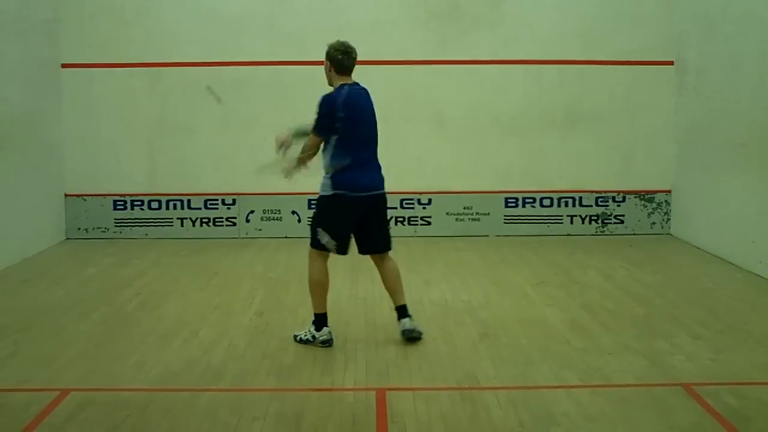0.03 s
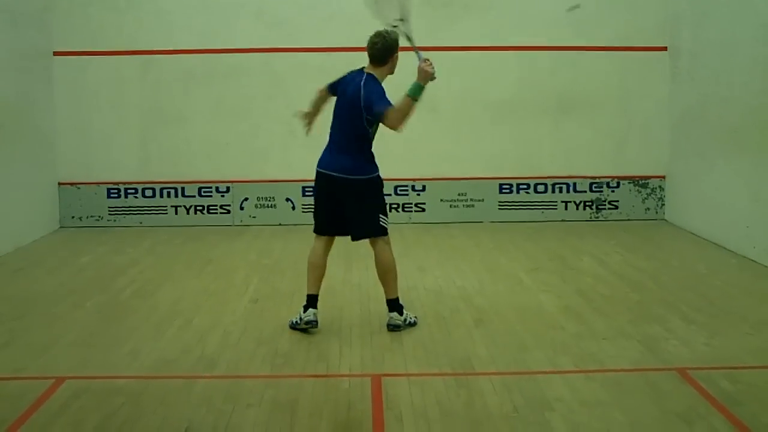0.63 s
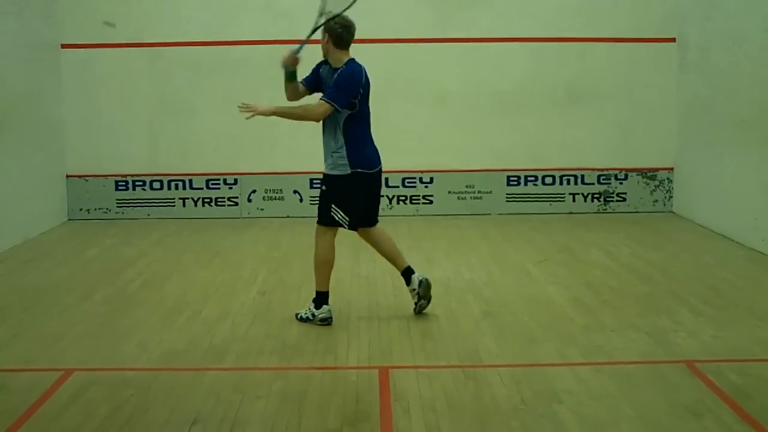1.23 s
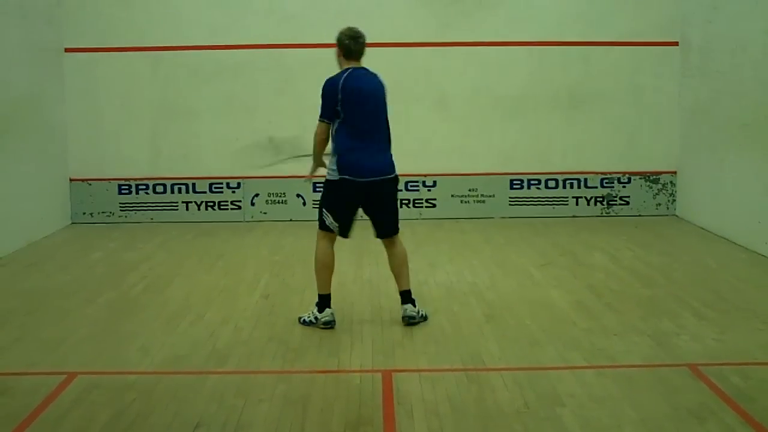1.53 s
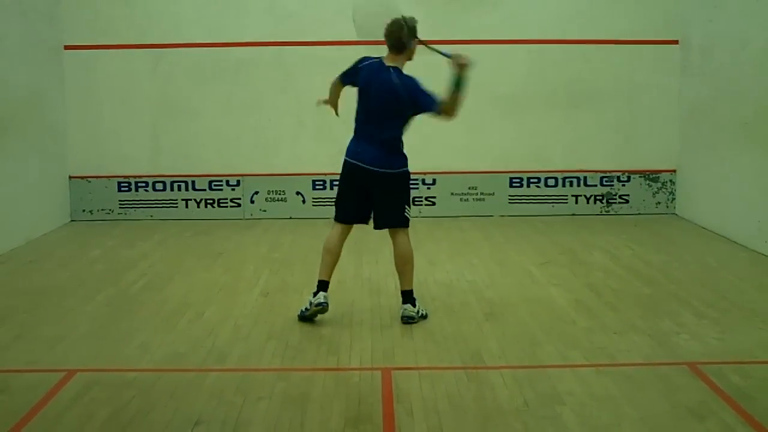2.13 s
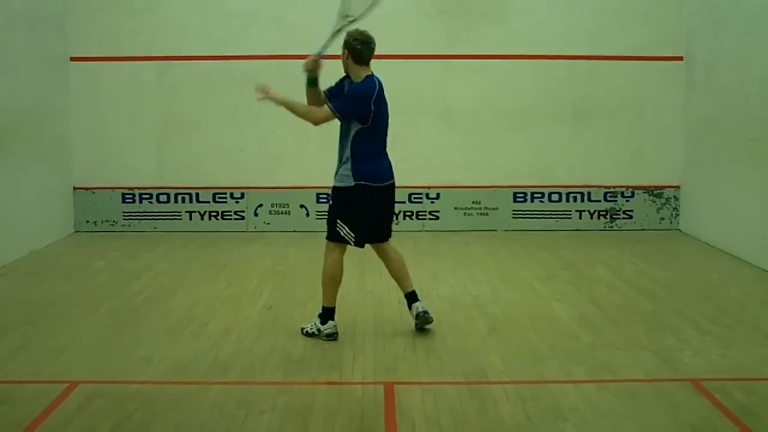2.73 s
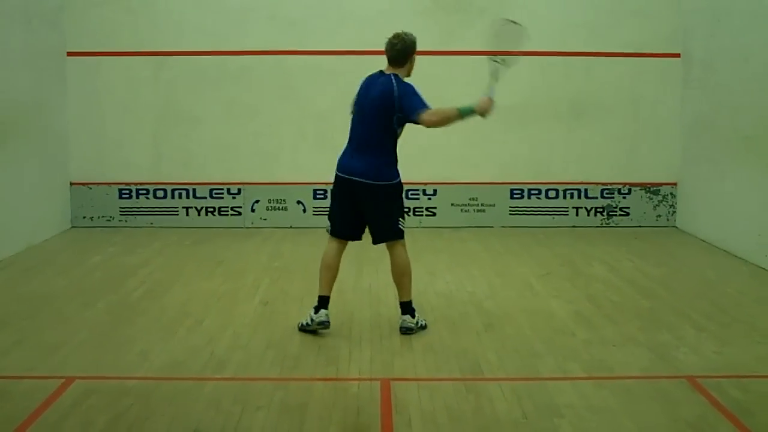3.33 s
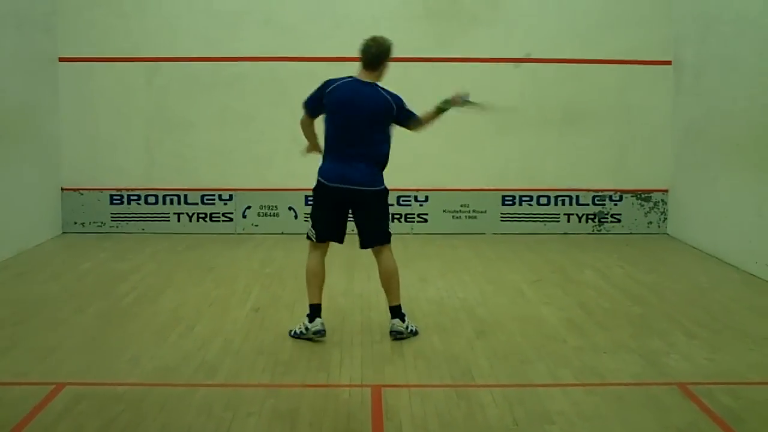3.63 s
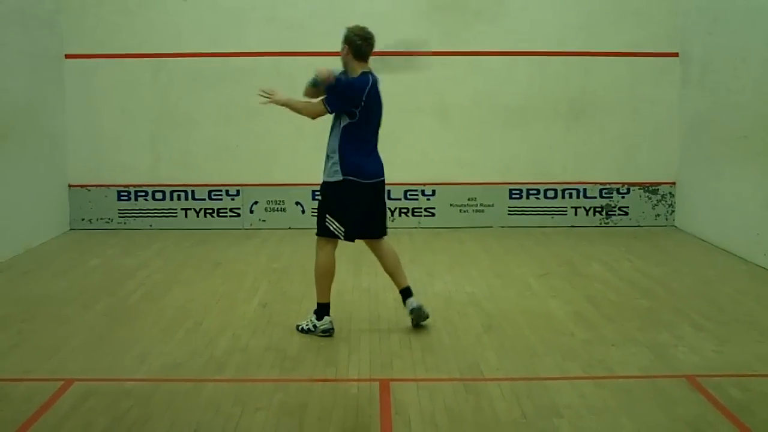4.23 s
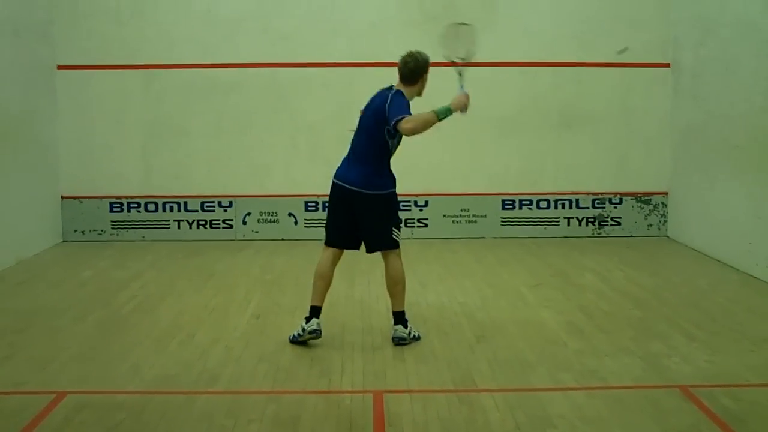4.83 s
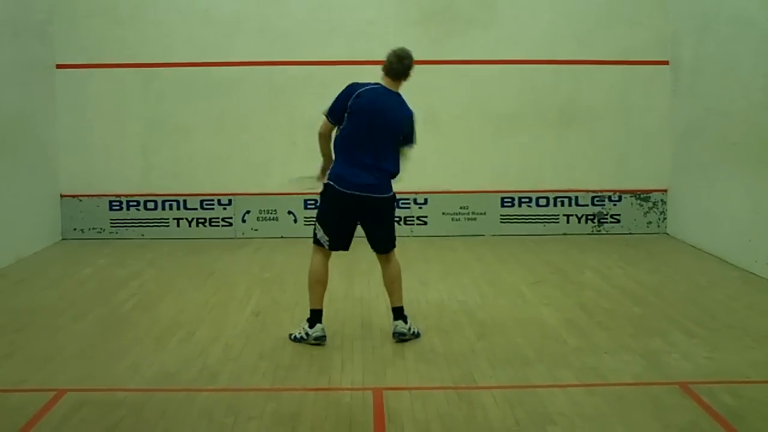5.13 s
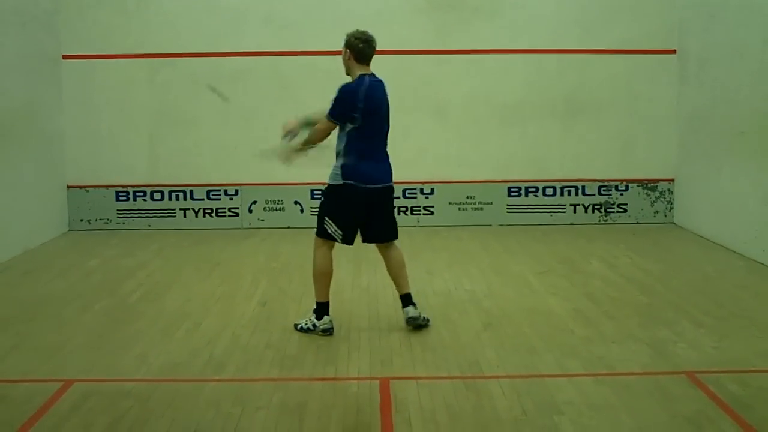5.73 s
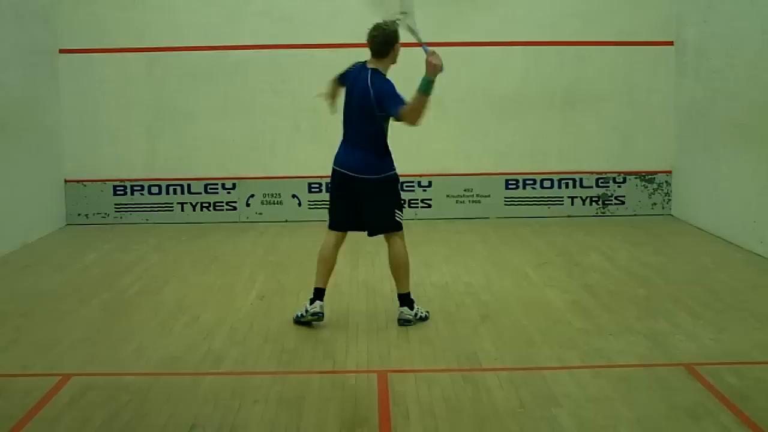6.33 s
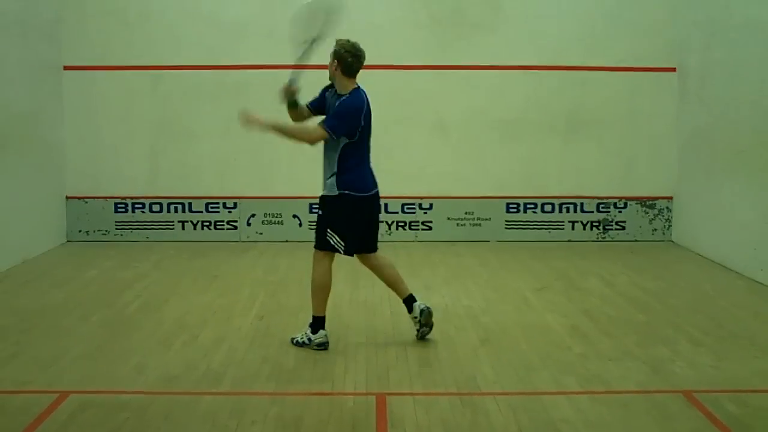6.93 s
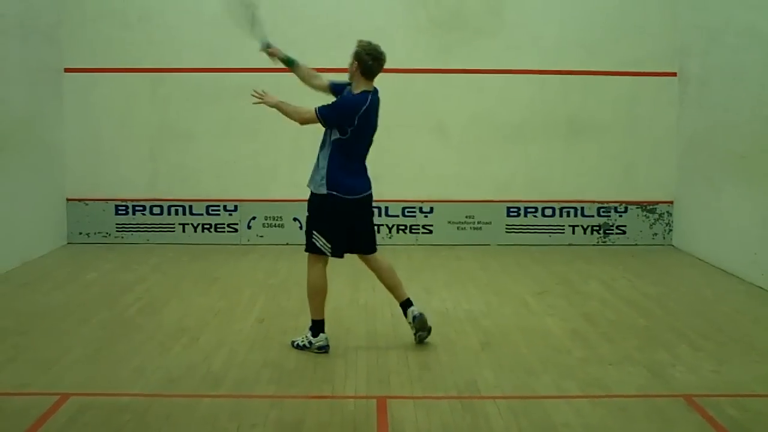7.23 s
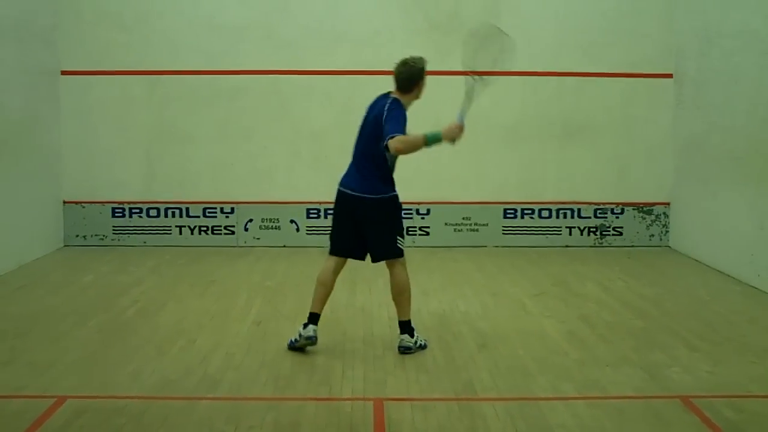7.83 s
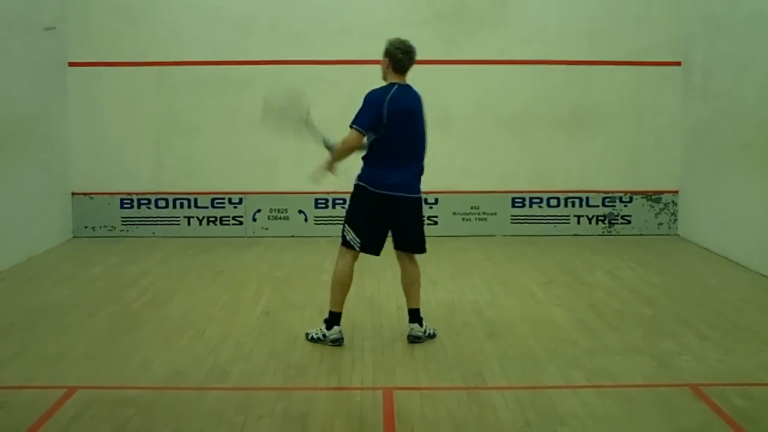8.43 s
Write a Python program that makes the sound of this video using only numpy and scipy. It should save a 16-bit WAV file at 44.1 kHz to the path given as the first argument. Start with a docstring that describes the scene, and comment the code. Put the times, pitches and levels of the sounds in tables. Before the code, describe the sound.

A squash ball is volleyed against a wall, hollow racket pocks and sharper smacks repeating steadily in an echoing court.

```python
"""A player volleys a squash ball against the front wall of a bare, echoing court.
First the racket squashes the hollow ball, which sounds a pock; on some strokes the strings ring.
About a seventh of a second later the ball meets the wall with a sharper smack. The hard walls return
a few distinct echoes, which merge into a long reverberant wash. Faint taps and ball thuds on the
floor follow between strokes, and under the whole rally the ventilation rumbles."""
import sys
import numpy as np
from scipy import signal
from scipy.fft import rfft, irfft
from scipy.io import wavfile

SR = 44100
rng = np.random.default_rng(int(sys.argv[2]) if len(sys.argv) > 2 else 0)


def master(y):
    """Save y as 16-bit WAV."""
    cut = np.clip(np.atleast_2d(y).T, -1, 1)
    pcm = np.round(cut * 32767)  # scale
    wavfile.write(sys.argv[1], SR, pcm.astype(np.int16))


N = 383669

# racket strokes: start_s, level_db, ball_pitch_hz, direct_db, string_ring_db
RACKET_STROKES = [(-.55, -5, 820, 0, -20), (.1670, 3, 845, 0, 2), (.8895, 3.5, 830, 0, -1),
                  (1.5789, 3, 780, -6, -13), (2.3134, 3, 890, -2, -4), (3.0551, 2, 807, -2.5, -28),
                  (3.7494, 4.5, 795, -2.5, -9), (4.4590, 2, 790, -0.5, -5), (5.1589, 2.5, 794, -4.5, -20),
                  (5.8530, 2.5, 827, 0.5, -14), (6.5780, 4.5, 840, -4.5, -7), (7.3133, -1.5, 930, -2, -13),
                  (8.214, 3, 820, -1, -17)]
# impacts on the front wall: start_s, level_db, ball_pitch_hz, hollow_tone_db
WALL_SMACKS = [(-.40, 1, 840, 0), (0.3175, 0, 945, -3.5), (1.0191, 1, 842, 2), (1.7324, -1.5, 960, -1),
               (2.4767, -0.5, 930, -3), (3.1990, 0, 916, -1.5), (3.8880, 0.5, 834, -0.5),
               (4.6100, 0, 850, -2.5), (5.2936, 0, 794, 1.5), (6.0170, -2, 910, 0.5), (6.7142, 0.5, 797, 3),
               (7.5501, -7.5, 980, -1), (8.3626, -0.5, 814, 2.5)]
# first paths of a stroke, straight and by floor and walls: detour_m, snap_over_tone_db
RACKET_PATHS = [(0, 4.5), (.9, 3.5), (2.9, -25), (8, 19), (9, 20.5)]
# first paths of a smack: detour_m, snap_over_tone_db
WALL_PATHS = [(0, 4), (.8, 2.5), (3.3, -20), (4.7, 6), (8.2, -3)]
# spectrum of a stroke's reverberation, under the ball's own tone: frequency_hz, density_db
RACKET_SPECTRUM = [(80, -78.5), (110, -63.5), (150, -58.5), (190, -59), (260, -54), (380, -52.5),
                   (590, -59.5), (730, -53.5), (1250, -58), (1800, -70.5), (2500, -76), (3300, -70.5),
                   (4500, -77.5), (10000, -78)]
# spectrum of a smack's reverberation, under the ball's own tone: frequency_hz, density_db
WALL_SPECTRUM = [(80, -67), (110, -58), (185, -54.5), (270, -46), (400, -45.5), (610, -53), (740, -50.5),
                 (1250, -52), (1600, -52.5), (2300, -63.5), (3400, -63.5), (4200, -68), (6200, -71),
                 (10000, -67)]
# reverberation times of the court: frequency_hz, t60_s
COURT_DECAY = [(170, 1.07), (300, 1.59), (680, 2.68), (900, 2.75), (1200, 2.31), (3200, 1.95), (5500, 1.38),
               (10000, 0.76)]
# faint taps and ball thuds on the floor between strokes: start_s, level_db
FLOOR_TAPS = [(0.727, -24), (1.382, -18.5), (2.199, -24), (2.849, -23), (3.584, -21), (5.061, -25),
              (6.449, -24)]
# spectrum of the ventilation: frequency_hz, density_db
VENT_SPECTRUM = [(15, -77), (30, -68.5), (42, -82), (58, -68.5), (80, -96), (200, -72.5), (1000, -103),
                 (4000, -104), (11000, -109)]

SOUND_M_PER_S = 343
AGE = np.arange(2 * SR) / SR  # time since a blow, s
CONTACT_AGE = AGE[:SR // 25]  # its first 40 ms
FREQS = np.arange(SR + 1) / 2  # frequency axis of a signal as long as AGE, Hz


def racket(bands, pock_db=-14, knock_db=-31, crack_db=-29.2, hollow_db=6, squashed=0.91):
    """Impact excitation: a stroke sets the ball's cavity, its shell and the strings vibrating."""
    out = np.zeros(N)
    paths = first_paths(RACKET_PATHS, distance_m=6.5, level_db=-2.5, slope_db_per_m=-1.4)
    for start_s, level_db, ball_hz, direct_db, ring_db in RACKET_STROKES:
        # a stroke off the sweet spot rings the strings, sounds less hollow and cracks more
        tone_db = -1.35 - 0.048 * ring_db
        bright_db = 0.14 * ring_db
        flattened_hz = ball_hz * squashed  # the pitch is lower while the ball is flat
        tone = from_db(pock_db + tone_db) * pock(flattened_hz, swell_s=0.0021)
        snap = from_db(crack_db + bright_db) * crack(decay_s=0.0013, low_hz=3000)
        snap += from_db(knock_db) * knock(swell_s=0.0027)
        colour = blow_colour(RACKET_SPECTRUM, ball_hz, hollow_db + tone_db, treble_db=2.8 + bright_db)
        room = wash(colour, bands, start_s=0.0096, build_s=0.038)
        near = from_db(direct_db) * early_sound(paths, tone, snap)
        add(out, from_db(level_db) * (near + room + from_db(ring_db) * string_ring()), start_s)
    return out


def wall(bands, pock_db=-10, knock_db=-16.5, crack_db=-21, click_db=-7, hollow_db=5, squashed=0.905):
    """A shorter contact has a wider spectrum: the hard wall gives a sharper smack than the racket."""
    out = np.zeros(N)
    paths = first_paths(WALL_PATHS, distance_m=5.7, level_db=-0.1, slope_db_per_m=0.54)
    for start_s, level_db, ball_hz, tone_db in WALL_SMACKS:
        # a ball squashed flat sounds hollower, cracks more and knocks less
        bright_db, shell_db = 0.56 * tone_db, -0.32 * tone_db
        direct_db = -1.6 + 0.27 * tone_db
        tone_gain = from_db(pock_db + tone_db)
        tone = tone_gain * pock(ball_hz * squashed, swell_s=0.0018)
        slap = from_db(crack_db) * crack(decay_s=0.00093, low_hz=5200)
        slap += from_db(click_db) * contact_click(low_hz=7100)
        snap = from_db(bright_db) * slap + from_db(knock_db + shell_db) * knock(swell_s=0.0011)
        colour = blow_colour(WALL_SPECTRUM, ball_hz, hollow_db + tone_db, treble_db=bright_db)
        room = wash(colour, bands, start_s=0.00074, build_s=0.032)
        echoes = flutter_echo(tone_gain * pock(ball_hz, swell_s=0.0034))
        hum = court_ring()
        near = from_db(direct_db) * early_sound(paths, tone, snap)
        add(out, from_db(level_db) * (near + room + echoes + hum), start_s)
    return out


def pock(hz, swell_s):
    """Damped oscillation: the squashed hollow ball swings for a few cycles."""
    return -np.sin(2 * np.pi * hz * CONTACT_AGE) * swell(swell_s)


def knock(swell_s, upper_db=-8):
    """Flexural resonance: the ball's shell sounds in two broad bands above its hollow tone."""
    shape = swell(swell_s)
    lower = burst(shape, low_hz=1080, high_hz=1690)
    upper = burst(shape, low_hz=2020, high_hz=3800)
    return lower + from_db(upper_db) * upper


def crack(decay_s, low_hz):
    """A brief transient is broadband: rubber slaps down in a bright burst."""
    return burst(np.exp(-CONTACT_AGE / decay_s), low_hz, high_hz=13500, order=1)


def contact_click(low_hz):
    """The first touch on hard plaster is an impulse, high-passed to a needle-sharp click."""
    highpass = signal.butter(2, low_hz, "high", fs=SR, output="sos")
    return signal.sosfilt(highpass, signal.unit_impulse(len(CONTACT_AGE)))


def string_ring():
    """Free vibration of the strings: a thin ring, blurred by the court."""
    return from_db(-58) * resonance_cluster(hz=2114, octaves=0.052, decay_s=0.24, build_s=0.011)


def swell(peak_s):
    """Elastic compression and release: an envelope that rises to 1 and quickly falls."""
    t = CONTACT_AGE / peak_s
    return (t * np.exp(1 - t)) ** 2


def burst(shape, low_hz, high_hz, order=2):
    """Band-limited noise, scaled to carry the energy of its envelope."""
    band = signal.butter(order, [low_hz, high_hz], "band", fs=SR, output="sos")
    noise = signal.sosfilt(band, rng.standard_normal(len(shape)) * shape)
    return noise * np.sqrt(np.sum(shape ** 2) / np.sum(noise ** 2))


def first_paths(detours, distance_m, level_db, slope_db_per_m):
    """Spherical spreading, plus a level slope along the detour; gives delay_s, tone_db, snap_db."""
    detour_m, snap_over_tone_db = np.transpose(detours)
    tone_db = level_db - 20 * np.log10(1 + detour_m / distance_m) + slope_db_per_m * detour_m
    return np.column_stack([detour_m / SOUND_M_PER_S, tone_db, tone_db + snap_over_tone_db])


def early_sound(paths, tone, snap, wander=.02):
    """Direct sound and early reflections superpose; the detours shift a little from shot to shot."""
    out = np.zeros(len(AGE))
    for delay_s, tone_db, snap_db in paths:
        arrival_s = delay_s * (1 + wander * rng.standard_normal())
        add(out, from_db(tone_db) * tone + from_db(snap_db) * snap, arrival_s)
    return out


def flutter_echo(tone, first_db=-9, step_db=-1.58, spread_db=4, trip_s=.057, count=9):
    """Flutter echo: the tone shuttles between front and back wall, unevenly strong on each return."""
    out = np.zeros(len(AGE))
    for k, (late, strength) in enumerate(rng.standard_normal((count, 2))):
        gain = from_db(first_db + k * step_db + spread_db * strength)
        add(out, gain * tone, (k + 2 + 0.0989 * late) * trip_s)
    return out


def wash(colour, bands, start_s, build_s, first_per_s=2500, thicken_s=.05):
    """Diffuse reverberation: reflections grow denser with time squared and die band by band."""
    chance = np.minimum(first_per_s * (1 + AGE / thicken_s) ** 2 / SR, 1)
    arrivals = rng.standard_normal(len(AGE)) * (rng.random(len(AGE)) < chance) / np.sqrt(chance)
    spectrum = rfft(arrivals) * colour * np.sqrt(SR / 2)
    swelling = .5 + .5 * np.tanh((AGE - start_s) / build_s)  # thin until the side walls have answered
    return sum(irfft(spectrum * share) * fade for share, fade in bands) * swelling


def blow_colour(table, ball_hz, tone_db, treble_db, ball_octaves=0.18, shelf_hz=2000):
    """A blow's spectrum: the ball's resonance adds a peak, its crack a treble shelf."""
    shelf = FREQS ** 2 / (FREQS ** 2 + shelf_hz ** 2)
    return from_db(at_hz(table, FREQS) + tone_db * bell(ball_hz, ball_octaves) + treble_db * shelf)


def court_bands():
    """Each overlapping band falls 60 dB in its reverberation time; gives (weights, envelope) pairs."""
    centres_hz, t60s = np.transpose(COURT_DECAY)
    shares = [at_hz(np.column_stack([centres_hz, one]), FREQS) for one in np.eye(len(centres_hz))]
    ending = np.minimum(1, 2 * (AGE[-1] - AGE))
    return [(share, np.exp(-np.log(1000) * AGE / t60) * ending) for share, t60 in zip(shares, t60s)]


def court_ring():
    """Room resonance: the court's longest ring lingers after a smack."""
    return from_db(-58.5) * resonance_cluster(hz=1000, octaves=0.095, decay_s=0.65, build_s=0.067)


def resonance_cluster(hz, octaves, decay_s, build_s):
    """Closely spaced resonances beat: narrow-band noise that builds up and dies away."""
    narrow = irfft(rfft(rng.standard_normal(len(AGE))) * bell(hz, octaves)) * np.sqrt(SR / 2)
    rise = 1 - np.exp(-(AGE / build_s) ** 2)
    ending = np.minimum(1, AGE[-1] - AGE)
    return narrow * rise * np.exp(-AGE / decay_s) * ending


def floor_taps(bands, crack_db=-29, thud_db=-10):
    """Light impacts excite the room: faint taps and ball thuds on the floor between strokes."""
    out = np.zeros(N)
    colour = from_db(at_hz(RACKET_SPECTRUM, FREQS) + 5.5)
    for start_s, level_db in FLOOR_TAPS:
        tap = wash(colour, bands, start_s=.005, build_s=0.011)
        add(tap, from_db(crack_db) * crack(decay_s=0.0053, low_hz=1500), 0)
        add(tap, from_db(thud_db) * pock(hz=820, swell_s=0.0018), 0)
        add(out, from_db(level_db) * tap, start_s)
    return out


def ticks(per_s=9, loudest_db=-39.25, range_db=1):
    """Random transients: the moving player's soles and clothes tick faintly."""
    out = np.zeros(N)
    for when, softness in rng.random((round(per_s * N / SR), 2)):
        gain = from_db(loudest_db - range_db * softness)
        add(out, gain * crack(decay_s=0.00074, low_hz=3000), when * N / SR)
    return out


def ventilation():
    """Stationary coloured noise: a low rumble with a trace of hiss."""
    colour = from_db(at_hz(VENT_SPECTRUM, np.arange(N // 2 + 1) * SR / N))
    return irfft(rfft(rng.standard_normal(N)) * colour, N) * np.sqrt(SR / 2)


def from_db(db):
    """Decibels to amplitude ratio."""
    return 10 ** (np.asarray(db) / 20)


def at_hz(points, hz):
    """Interpolation on a logarithmic frequency axis."""
    knots, values = np.transpose(points)
    return np.interp(np.log(hz + 1e-6), np.log(knots), values)


def bell(centre_hz, octaves):
    """A Gaussian peak of height 1 in log frequency."""
    return np.exp(-.5 * (np.log2((FREQS + 1e-6) / centre_hz) / octaves) ** 2)


def add(track, sound, start_s):
    """Superposition: mix a sound in at a time, which may be negative."""
    start = round(start_s * SR)
    first, last = max(start, 0), min(start + len(sound), len(track))
    track[first:last] += sound[first - start:last - start]


def scene():
    """The pressures of all sources add at the back of the court."""
    bands = court_bands()
    return (racket(bands) + wall(bands) + floor_taps(bands) + ventilation() + ticks())[None]


def record(dry, ceiling=.8, rolloff_hz=10550, cutoff_hz=12200):
    """Saturation and band limiting: the microphone rounds the highest peaks and loses the top treble."""
    rounded = dry / (1 + (dry / ceiling) ** 4) ** .25
    soft = signal.sosfilt(signal.butter(12, rolloff_hz, fs=SR, output="sos"), rounded)
    return signal.sosfilt(signal.ellip(10, .1, 80, cutoff_hz, fs=SR, output="sos"), soft)


dry = scene()
out = record(dry)
master(out)
```